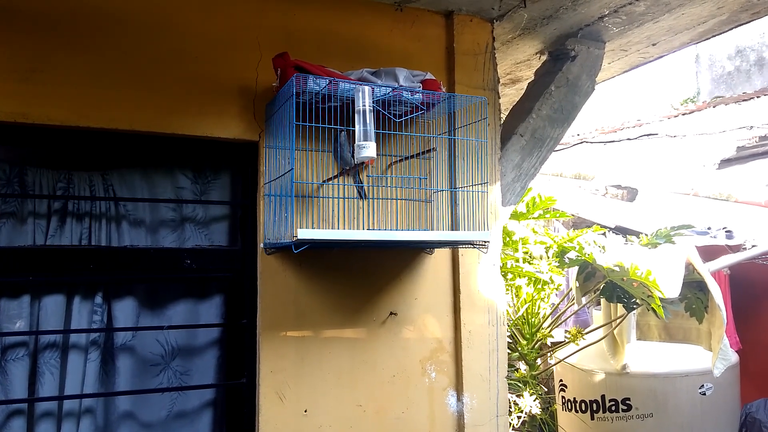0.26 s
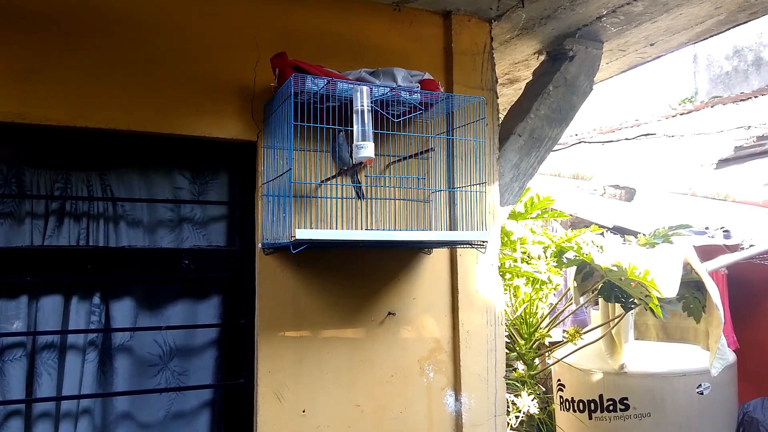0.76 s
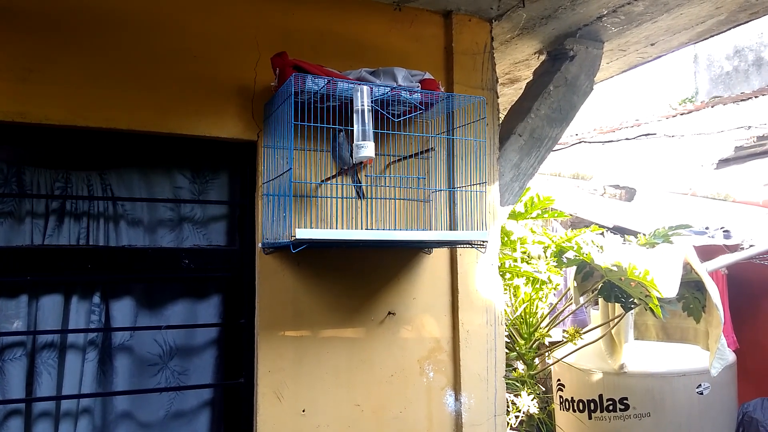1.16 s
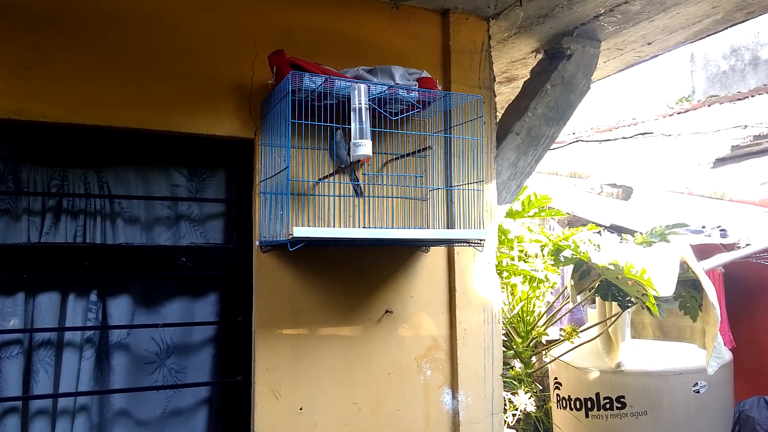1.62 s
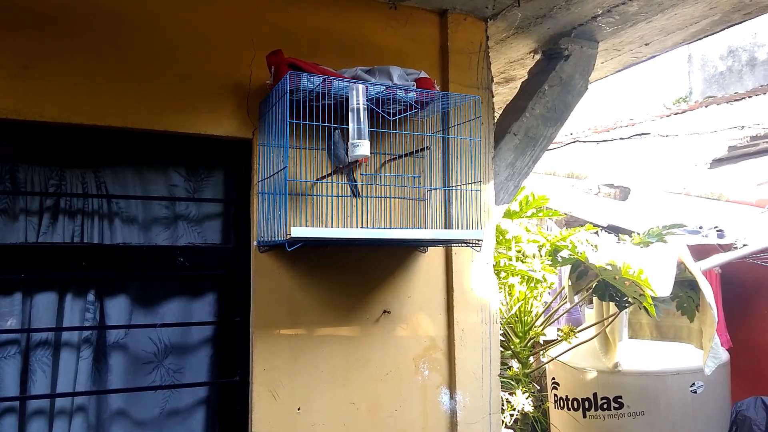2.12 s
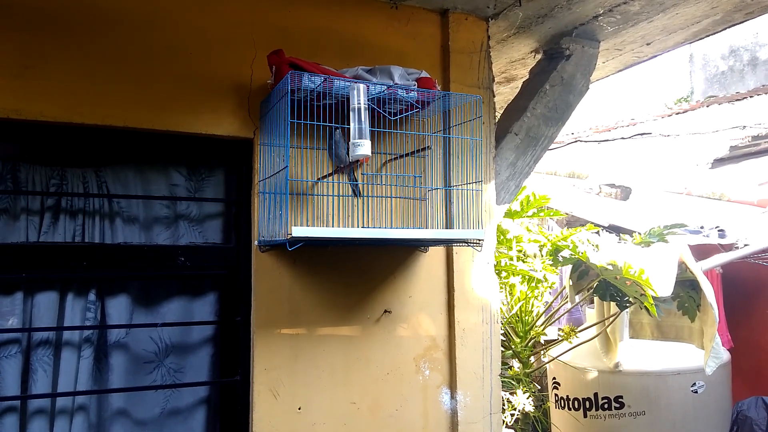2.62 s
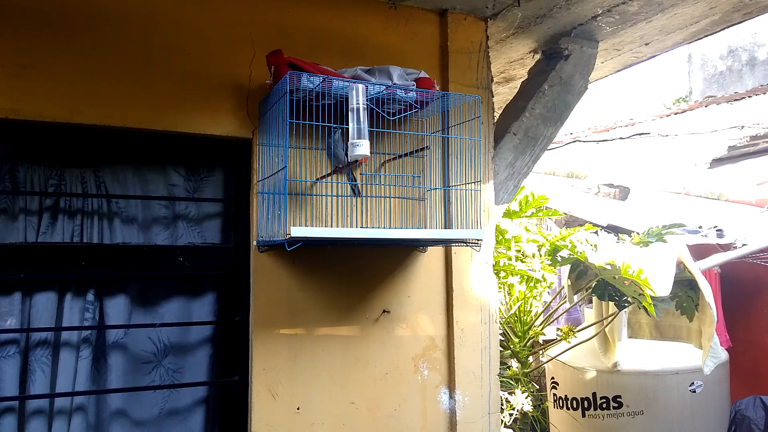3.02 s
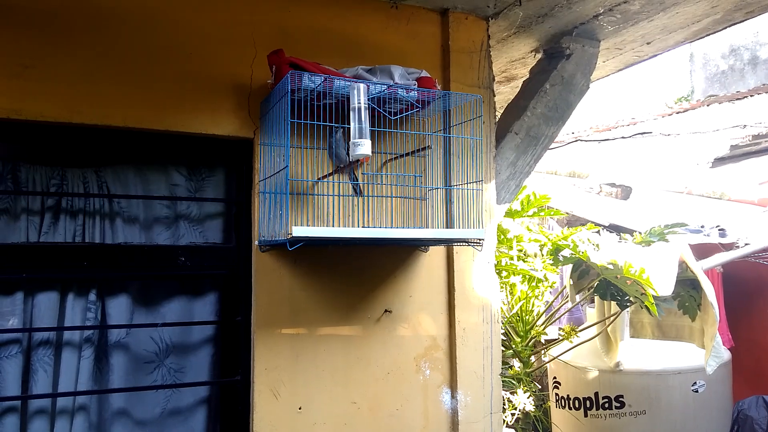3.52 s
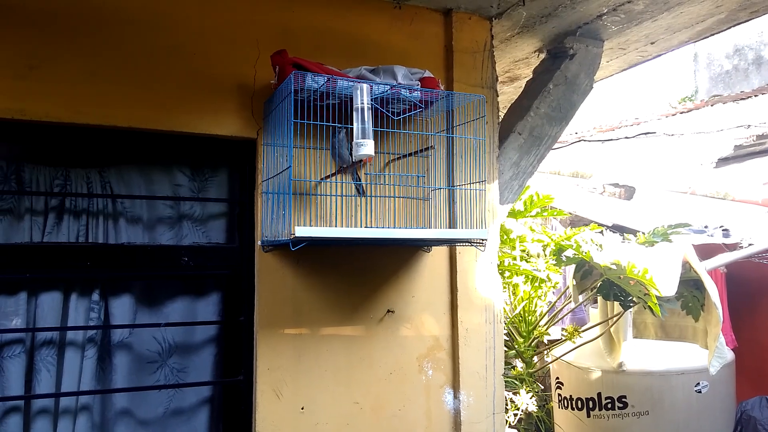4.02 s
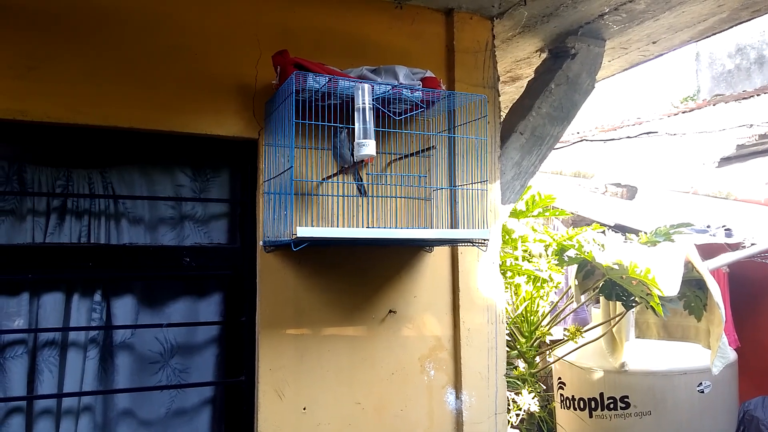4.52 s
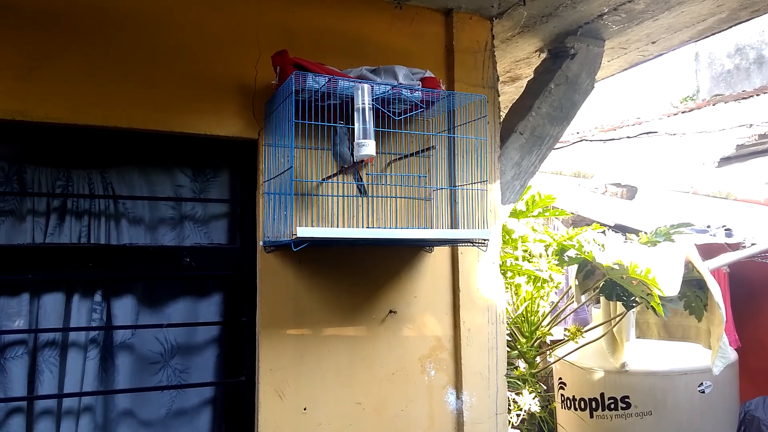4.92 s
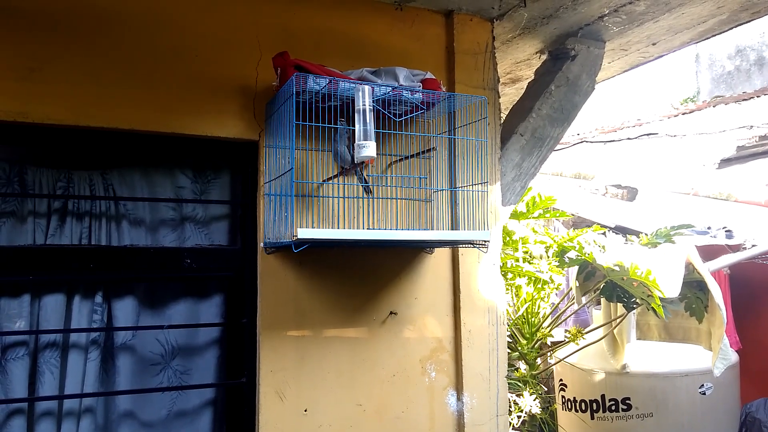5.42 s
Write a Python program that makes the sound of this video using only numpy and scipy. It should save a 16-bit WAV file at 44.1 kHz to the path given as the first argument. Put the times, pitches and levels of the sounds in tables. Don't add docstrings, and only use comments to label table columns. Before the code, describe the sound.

A songbird's hurried, high chatter starts at once, mixing nasal squeaks, sharp clicks and paired whistles, with an echo off house walls. It stops just before three seconds. A soft, low hum and dull distant rush continue, faint wire ticks follow, then a weak note and a harsh two-part call. The phone's wide stereo lowers the background when the bird is loud.

```python
import sys
import numpy as np
from scipy import signal
from scipy.fft import rfft, irfft, next_fast_len
from scipy.io import wavfile
from scipy.ndimage import uniform_filter1d, map_coordinates

SR = 44100
rng = np.random.default_rng(int(sys.argv[2]) if len(sys.argv) > 2 else 0)


def inscribe(sig):
    pcm = np.round(np.clip(np.atleast_2d(sig).T, -1, 1) * 32767)
    wavfile.write(sys.argv[1], SR, pcm.astype(np.int16))


def voltage_ratio(level):
    return 10 ** (np.asarray(level, float) / 20)


N = 249606

# start_s, length_s, from_hz, to_hz, level_db
TRILLS = [
    (.001, 0.071, 7650, 5610, -25.5),
    (1.172, 0.11, 2835, 4640, -37),
    (1.661, 0.067, 4000, 5630, -35),
    (1.935, 0.075, 2700, 4600, -22),
    (2.54, 0.065, 6390, 5450, -27.5),
    (2.602, 0.046, 7314, 4770, -22),
]
# start_s, length_s, from_hz, to_hz, level_db
WARBLES = [(0, 0.073, 4805, 4664, -38), (0, 0.015, 3780, 3840, -50), (.09, 0.05, 3550, 3150, -33),
           (.093, 0.073, 3030, 2970, -29.5), (.122, 0.051, 3765, 3624, -29.5),
           (.255, .07, 3890, 3550, -38.5), (.279, 0.044, 2348, 2150, -24.5),
           (.786, 0.081, 2200, 1856, -35.5), (.8, 0.068, 2935, 2780, -32), (4.73, .07, 4400, 4300, -27),
           (1.3, .05, 1182, 1573, -26.5), (1.377, 0.073, 3070, 1607, -22), (2.02, 0.042, 2700, 2720, -30),
           (2.05, 0.045, 3400, 3390, -36), (2.754, 0.023, 2830, 3183, -25.5),
           (2.765, 0.0716, 3607, 3465, -33.5), (4.244, 0.089, 1910, 2283, -38.5),
           (1.34, 0.045, 1402, 1920, -38.5)]
# start_s, from_hz, to_hz, level_db
FLICKS = [(.225, 7120, 5120, -27), (.584, 1810, 2730, -27), (.614, 2830, 5450, -31),
          (.869, 3125, 4820, -22.5), (.884, 3420, 6100, -18), (.912, 2940, 3330, -27),
          (.946, 3390, 2650, -22.5), (1.179, 2920, 4200, -38), (1.587, 5740, 5500, -14),
          (1.605, 3016, 5500, -19), (1.645, 5630, 5510, -12), (1.654, 2740, 4400, -31),
          (1.752, 1960, 2140, -29), (.038, 5700, 5700, -30), (1.158, 3680, 3660, -42),
          (1.178, 3790, 3700, -26), (1.166, 3000, 2600, -27), (1.209, 2950, 2600, -25),
          (1.229, 2750, 2900, -23), (1.249, 2750, 3050, -24), (2.454, 2650, 3000, -29),
          (1.226, 3470, 3690, -27.5), (1.238, 3600, 3780, -31), (1.428, 4085, 3450, -12.5),
          (1.317, 4280, 3700, -22), (1.455, 3896, 3080, -26), (2.752, 3744, 3590, -27),
          (2.188, 4070, 3960, -23.5), (.742, 3670, 3750, -25), (1.779, 3470, 3980, -25),
          (1.799, 3440, 5100, -22), (1.87, 5730, 5560, -13.5), (1.872, 3600, 4020, -37),
          (1.919, 3000, 4050, -37), (1.945, 2930, 4830, -27), (1.934, 3670, 4120, -27),
          (1.668, 3590, 4060, -30), (1.676, 5590, 5460, -16), (.921, 3630, 3760, -22),
          (2.187, 4020, 3700, -40), (2.238, 5190, 5730, -21), (2.238, 6730, 6560, -25.5),
          (2.473, 3100, 6320, -30), (2.482, 3760, 3920, -23.5), (2.782, 4260, 5330, -30),
          (2.794, 5400, 5100, -24), (2.801, 5640, 7140, -29)]
# start_s, from_hz, to_hz, level_db
CHIRPS = [(.071, 3610, 3910, -25), (.296, 2280, 1492, -27), (.597, 2598, 3320, -28.5),
          (.62, 3010, 2990, -23), (.777, 4600, 4510, -24), (.851, 7250, 5530, -28.5),
          (1.159, 4240, 4680, -48), (1.18, 2650, 2950, -33), (1.34, 2900, 3070, -29.5),
          (1.419, 4350, 4130, -23), (1.752, 2680, 2860, -24), (1.794, 3140, 3350, -23.5),
          (2.174, 2970, 4380, -27.5), (2.234, 7970, 6780, -32), (2.452, 2500, 3330, -33),
          (2.48, 3700, 3865, -29.5), (2.484, 2930, 2640, -26), (2.748, 2842, 3280, -18),
          (2.748, 4026, 3465, -20)]
# start_s, length_s, from_hz, to_hz, level_db
RASPS = [(.235, 0.0735, 4850, 4750, -25.5), (.25, 0.048, 3800, 3750, -32.5), (.298, 0.056, 4400, 4800, -46),
         (.345, 0.028, 3666, 2905, -29), (.722, 0.036, 3620, 3800, -31.5), (.901, 0.06, 3974, 4500, -36.5),
         (1.262, 0.03, 2810, 2967, -33), (1.208, 0.033, 3406, 4760, -32), (1.258, 0.085, 5450, 4750, -27),
         (1.262, 0.097, 4610, 3824, -24), (1.452, 0.038, 4700, 3560, -48), (1.62, 0.07, 4240, 4325, -36),
         (2.205, 0.051, 2700, 2817, -32), (2.25, 0.03, 5460, 5260, -43.5), (2.53, 0.21, 3900, 3795, -38.5),
         (2.556, 0.14, 7700, 7480, -37.5), (2.574, 0.1, 3160, 3300, -42.5), (2.68, .08, 5800, 4900, -37),
         (2.59, 0.056, 4700, 4900, -38.5), (2.478, .04, 5500, 4800, -37), (4.58, 0.11, 1709, 2247, -31.5),
         (4.59, 0.11, 2900, 3615, -40), (4.601, 0.08, 5690, 6630, -43.5), (4.6, 0.11, 3600, 4350, -34.5),
         (4.7, 0.09, 4500, 4350, -24.5), (4.72, .075, 4050, 3900, -28), (4.69, 0.071, 5450, 5020, -22.5),
         (4.67, .05, 4300, 4900, -29.5), (4.74, .05, 5000, 4750, -29), (4.66, 0.054, 3300, 3500, -34),
         (4.65, 0.062, 6060, 6480, -40.5), (4.66, 0.048, 3110, 3700, -46)]
# start_s, length_s, from_hz, to_hz, level_db
WHISTLES = [(.29, 0.22, 2300, 2300, -30), (.392, 0.08, 3573, 3713, -30), (.624, 0.023, 3704, 3600, -31),
            (.652, 0.028, 2980, 2930, -21), (.672, .052, 2922, 2928, -17.5),
            (.678, 0.054, 2990, 2990, -15.5), (.706, 0.045, 4540, 4620, -27.5),
            (.733, 0.026, 3036, 3400, -28), (.89, 0.011, 5740, 5310, -14),
            (.916, 0.0352, 3596, 3784, -24.5), (1.412, 0.06, 4430, 2650, -24),
            (1.38, .035, 5800, 4450, -27), (4.235, .06, 2990, 3190, -37), (4.285, .07, 3170, 3310, -39),
            (1.614, 0.035, 5600, 5330, -24), (1.66, 0.023, 5550, 5637, -22.5),
            (1.79, 0.078, 2780, 2970, -20), (1.815, 0.036, 4220, 4350, -20),
            (1.887, 0.036, 5546, 5560, -27.5), (2.022, 0.125, 2795, 2810, -19.5),
            (2.05, 0.1, 2985, 2992, -19), (2.07, .055, 2895, 2905, -26), (2.712, 0.043, 2560, 2740, -21),
            (2.705, 0.022, 3630, 3810, -26), (2.12, 0.039, 2900, 2910, -23), (2.085, .04, 2610, 2600, -33),
            (2.05, .075, 3190, 3200, -31), (1.285, 0.067, 4700, 4800, -40), (1.315, .06, 3920, 3815, -34)]
FLICK_S, CHIRP_S = 0.0095, 0.0183
FLICK_HZ, CHIRP_HZ, WHISTLE_HZ, WARBLE_HZ, RASP_HZ = 6.6, 34.1, 12.2, 63, 216.8
SWEEPS_PER_S = 88

# time_s, membrane_strain_db, lopsided_swing_db, breath_db
EFFORT = [(0, 13, -13, -5.5), (.12, 0, 6, -15.5), (.33, 0, 7, -22), (.5, 16.5, 5.5, -2.5),
          (.62, 0, 6.5, -29.5), (.72, -7, -34, -22.5), (.85, -1, 1.5, -10), (1.22, 5, -1, -10.5),
          (1.3, -2.5, -36, -13.5), (1.39, 11.5, 7, -53), (1.45, -16, 13, -3), (1.62, -14.5, 12, -14),
          (1.78, -4.5, 3.5, -25.5), (1.9, -4, 8, -3.5), (2.07, -11.5, -1.5, -30.5), (2.24, -5.5, 13, -24),
          (2.6, 2, 0.5, -11.5), (2.8, 0.5, 3.5, -26.5),
          (4.3, -23, -13, -51),
    (4.6, -21, 22, -27),
    (4.67, 15.5, -12, -7.5),
    (4.7, 6, 1, -8.5),
    (4.74, -7, 12, -20.5),
    (4.8, -12, 1, -26),
]
EVEN_DB, ODD_DB = -20, -17
# frequency_hz, gain_db
BEAK = [(600, -68), (1300, -19), (1900, -9), (3000, -0.5), (5000, 3), (7000, 0), (10000, 0.5), (15000, 7)]
# frequency_hz, level_db
BREATH = [(1000, -26), (2000, -13.5), (4000, 4.5), (5200, 0), (6800, -7), (8500, 1), (10000, -9),
          (11300, -3), (12900, -10), (14200, -6), (16000, -29)]
# time_s, straight_path_db, lean_to_left_port_db
HEAD = [(0, 2.5, -4), (.1, -1.5, -0.5), (.27, 2, -4), (.45, 0, 0), (.64, 3.5, 3), (.7, 7, 1.5), (.76, 3, 2),
        (.9, 2.5, 2), (1.18, 2, 5), (1.24, -1, 6), (1.43, 1, 4), (1.6, 4, 3.5), (1.8, 3.5, -2),
        (1.95, 0.5, 3), (2.04, 5, -5), (2.11, 6, -3.5), (2.25, -1, 7.5), (2.55, -0.5, 5.5), (2.76, 3.5, 4),
        (4.3, 2, 3), (4.65, -0.5, 3), (4.75, 3.5, 2)]
# frequency_hz, t60_s
PORCH = [(300, 0.49), (3000, 0.53), (6000, 0.49), (10000, 0.55), (15000, 0.32)]

# start_s, depth_db
DUCKS = [
    (0, 7.5),
    (.1, 11),
    (.71, 9),
    (.9, 12),
    (1.45, 9.5),
    (1.91, 7),
    (2.1, 13.5),
    (2.8, 9),
    (4.74, 9),
]
STREET_DB, RECOVER_DB_PER_S, DUCK_S = -43.5, 11.5, 0.064
# frequency_hz, density_db_per_hz
RUSH = [(40, -18), (60, 7.5), (200, 3.5), (600, -0.5), (1250, 0), (1600, -8.5), (1850, -12), (2050, -11),
        (2400, -5.5), (2850, -5.5), (3300, -21.5), (4000, -27), (7000, -29.5), (15000, -33)]
# frequency_hz, correlation (no unit)
ALIKE = [(100, 0.78), (500, 0.78), (1000, -0.04), (1600, 0.1), (3000, 0.48), (4200, 0.47), (4850, -0.49),
         (5500, -0.022)]
# frequency_hz, level_db
HUM = [(120, -6.5), (180, -9.5), (240, -4.5), (480, -13), (578, -10.5), (636, -12), (955, -17.5),
       (1270, -13.5)]
# time_s, level_db
DRONE = [(0.0, -63), (0.28, -69), (0.66, -48), (0.71, -59), (0.87, -57), (0.96, -68), (1.29, -49),
         (1.37, -54), (1.59, -48), (1.87, -63), (2.74, -58), (2.79, -68), (3.48, -45), (3.7, -63),
         (4.67, -48), (4.82, -68), (5.64, -53), (5.66, -59)]

# start_s, peak_db, rattle_t60_s
TICKS = [
    (3.5169, -68, 0.073),
    (3.549, -51.5, 0.062),
    (3.9494, -68.5, 0.089),
    (4.1974, -67.5, 0.069),
]
# frequency_hz, gain_db
WIRE = [(3000, -36.5), (6000, -1), (8000, 12), (10000, 10), (14000, 9), (16000, 1)]

# frequency_hz, gain_db
LEFT_PORT = [(100, 0.5), (1200, -9.5), (2500, -2.5), (5000, -5), (7500, -8.5), (10400, -17), (12000, -10),
             (15000, -16)]
# frequency_hz, gain_db
CROSSFEED = [(100, -3), (1200, -3), (2400, -2), (3600, -3), (4900, -7), (7200, -5), (9000, -7),
             (10400, -14), (11700, -9), (13000, -13), (15000, -12)]
PORT_LAG_S = 1 / 2470
BAND_BINS = 8
TOP_HZ, TOP_WIDTH_HZ = 15450, 150


def unit(x):
    return x / np.sqrt(np.mean(x ** 2) + 1e-20)


def along(points, hz):
    f, v = np.transpose(points)
    return np.interp(np.log(hz + 1), np.log(f + 1), v)


def curves(rows):
    time_s, *columns = np.transpose(rows)
    return [np.interp(np.arange(N) / SR, time_s, column) for column in columns]


def wobble(rate):
    knots = rng.standard_normal(int(N * rate / SR) + 4)
    return map_coordinates(knots, [np.arange(N) * rate / SR])


def filtered(x, response):
    m = next_fast_len(N + SR // 2)
    return irfft(rfft(x, m) * response(np.fft.rfftfreq(m, 1 / SR)), m)[..., :N]


def coloured(x, points):
    return filtered(x, lambda hz: voltage_ratio(along(points, hz)))


def add_trills(voice, air, flutter, throb):
    for start_s, length_s, from_hz, to_hz, level_db in TRILLS:
        start = max(round(start_s * SR), 0)
        span = slice(start, start + int(length_s * SR))
        sweep_rate = SWEEPS_PER_S * (1 + 0.2 * np.tanh(throb[span]))
        phase = np.cumsum(sweep_rate) / SR % 1
        u = np.clip(phase / 0.5, 0, 1)
        swell = voltage_ratio(level_db) * np.sin(np.pi * u)
        pitch = from_hz * (to_hz / from_hz) ** u + 180 * flutter[span]
        voice[start:][:len(u)] += swell * np.sin(2 * np.pi * np.cumsum(pitch) / SR)
        air[start:][:len(u)] += swell


def song():
    notes = []
    for rows, length_s, flutter_hz in [(FLICKS, FLICK_S, FLICK_HZ), (CHIRPS, CHIRP_S, CHIRP_HZ)]:
        notes += [(start_s, length_s, *rest, flutter_hz) for start_s, *rest in rows]
    for rows, flutter_hz in [(WHISTLES, WHISTLE_HZ), (WARBLES, WARBLE_HZ), (RASPS, RASP_HZ)]:
        notes += [(*row, flutter_hz) for row in rows]
    return notes


def add_notes(voice, air, flutter, throb):
    for start_s, length_s, from_hz, to_hz, level_db, flutter_hz in song():
        start = round(start_s * SR)
        u = np.linspace(0, 1, int(length_s * SR))
        pitch = from_hz * (to_hz / from_hz) ** u + flutter_hz * flutter[start:][:len(u)]
        edges = np.clip(np.minimum(u / 0.0028, (1 - u) / 0.0042) * length_s, 0, 1)
        swell = voltage_ratio(level_db) * edges * np.sin(np.pi * u) ** 0.5
        swell *= voltage_ratio((1.5 + flutter_hz / 45) * np.tanh(throb[start:][:len(u)]))
        voice[start:][:len(u)] += swell * np.sin(2 * np.pi * np.cumsum(pitch) / SR)
        air[start:][:len(u)] += swell


def bird():
    voice, air = np.zeros(N + SR), np.zeros(N + SR)
    flutter, throb = wobble(450), wobble(110)
    add_notes(voice, air, flutter, throb)
    add_trills(voice, air, flutter, throb)
    voice, air = voice[:N], air[:N]

    strain_db, lopsided_db, breath_db = curves(EFFORT)
    swing = voice / (air + 1e-9)
    even = voltage_ratio(EVEN_DB + strain_db + lopsided_db) * (2 * swing ** 2 + 0.37 * swing ** 4)
    odd = voltage_ratio(ODD_DB + strain_db) * (2 * swing ** 3 + 1.32 * swing ** 5)
    tone = coloured(air * (swing + even + odd), BEAK)
    hiss = unit(coloured(rng.standard_normal(N), BREATH))
    breath = uniform_filter1d(air, size=900) * voltage_ratio(breath_db - 2) * hiss
    return voltage_ratio(3) * (tone + breath)


def porch(x):
    hz, t, z = signal.stft(rng.standard_normal((2, SR * 3 // 4)), SR, nperseg=256)
    decay = voltage_ratio(-60 * t / along(PORCH, hz)[:, None])
    tail = signal.istft(z * decay, SR, nperseg=256)[1]
    age = np.arange(tail.shape[1]) / SR
    tail *= (1 - np.exp(-age / 0.00048)) * (1 + 0.34 * np.exp(-age / 0.084))
    tail /= np.linalg.norm(tail[0])
    walls = rng.random((8, 2))
    for port in range(2):
        tail[port, (60 + 900 * walls[:, port]).astype(int)] += 0.14
    return signal.fftconvolve(x[None], tail, axes=1)[:, :N]


def ducking():
    start_s, depth_db = np.transpose(DUCKS)[:, :, None]
    age = np.arange(N) / SR - start_s
    depth = (age >= 0) * (depth_db - RECOVER_DB_PER_S * age)
    return uniform_filter1d(np.clip(depth.max(axis=0), 0, None), int(DUCK_S * SR) + 1)


def pump_hum():
    t = np.arange(N) / SR
    hum = np.zeros(N)
    for hz, level_db in HUM:
        hum += voltage_ratio(level_db + 2.5 * wobble(7)) * np.sin(2 * np.pi * hz * t + 0.53 * wobble(5))
    return hum


def street():
    z = signal.stft(rng.standard_normal((2, N)), nperseg=512)[2]
    patches = uniform_filter1d(rng.standard_normal(z.shape[1:]), size=6, axis=0)
    patches = uniform_filter1d(patches, size=14, axis=1)
    pair = signal.istft(z * voltage_ratio(2.0 * unit(patches)), nperseg=512)[1][:, :N]

    def mid_side_response(hz):
        angle = np.arccos(np.clip(along(ALIKE, hz), -1, 1)) / 2
        return voltage_ratio(along(RUSH, hz)) * [np.cos(angle), np.sin(angle)]

    mid, side = filtered(pair, mid_side_response)
    rush = unit(np.array([mid + side, mid - side]))
    return voltage_ratio(STREET_DB - ducking() + 6.5) * (rush + pump_hum() * voltage_ratio([[-5], [-1]]))


def drone():
    level_db, = curves(DRONE)
    pitch = 61 + 2.5 * wobble(5)
    return voltage_ratio(level_db + [[4.5], [7.5]]) * np.sin(2 * np.pi * np.cumsum(pitch) / SR)


def cage():
    out, t = np.zeros(N + SR), np.arange(SR // 2) / SR
    for start_s, peak_db, t60_s in TICKS:
        rattle = voltage_ratio(peak_db + 11.5 - 60 * t / t60_s) * rng.standard_normal(len(t))
        out[round(start_s * SR):][:len(t)] += rattle
    return coloured(out[:N], WIRE)


def scene():
    near = bird() + cage()
    facing_db, lean_db = curves(HEAD)
    arrivals = np.array([near, np.pad(near, (4, 0))[:N]])
    direct = arrivals * voltage_ratio(facing_db + [lean_db - 2.5, -lean_db - 7])
    return direct + porch(near * voltage_ratio(-0.6 * facing_db)) + street() + drone()


def masked(pair, under_db, slope_db, beside_db):
    hz, _, z = signal.stft(pair, SR, nperseg=1024)
    band = (np.arange(len(hz)) + BAND_BINS // 2) // BAND_BINS
    first_bins = np.unique(band, return_index=True)[1]
    level = np.add.reduceat(abs(z) ** 2, first_bins, axis=1)
    level = uniform_filter1d(level, size=3, axis=2)
    strongest = level.max(axis=0)
    loud = strongest * (strongest > voltage_ratio(-63))
    index = np.arange(level.shape[1])
    apart = abs(index[:, None] - index)
    reach = voltage_ratio(2 * (under_db - slope_db * apart))
    spread = (reach[:, :, None] * loud).max(axis=1)
    heard = level > np.maximum(spread, level[::-1] * voltage_ratio(2 * beside_db))
    keep = heard[:, band] | (hz < 1900)[:, None]
    return signal.istft(z * keep, SR, nperseg=1024)[1][:, :N]


def low_pass(x):
    return signal.sosfilt(signal.butter(12, 15790, fs=SR, output="sos"), x)


def record(dry):
    ports = np.array([coloured(dry[0], LEFT_PORT), dry[1]])

    def delayed_share(hz):
        return voltage_ratio(along(CROSSFEED, hz)) * np.exp(-2j * np.pi * hz * PORT_LAG_S)

    across = filtered(ports[::-1], delayed_share)
    left, right = masked(voltage_ratio(-1.5) * (ports - across), under_db=-33, slope_db=0.8, beside_db=-11)
    mid_side = np.array([left + right, left - right]) / 2
    mid, side = masked(mid_side, under_db=-37, slope_db=0.9, beside_db=-11)
    stereo = np.array([mid + side, mid - side])
    mix = filtered(stereo, lambda hz: 0.5 - 0.5 * np.tanh((hz - TOP_HZ) / TOP_WIDTH_HZ))
    return low_pass(mix)


dry = scene()
out = record(dry)
inscribe(out)
```